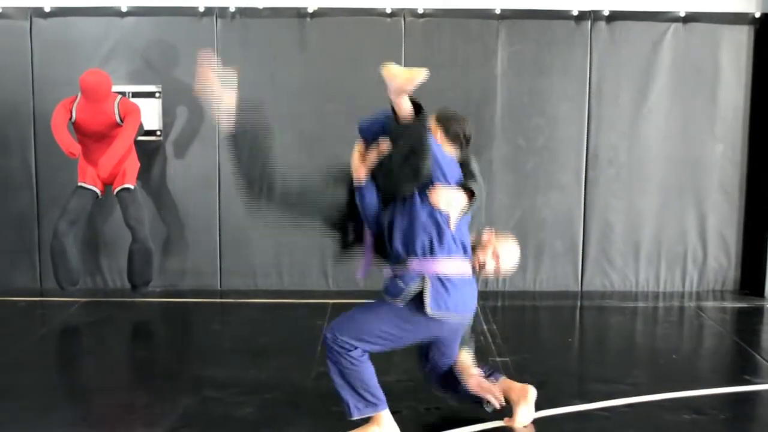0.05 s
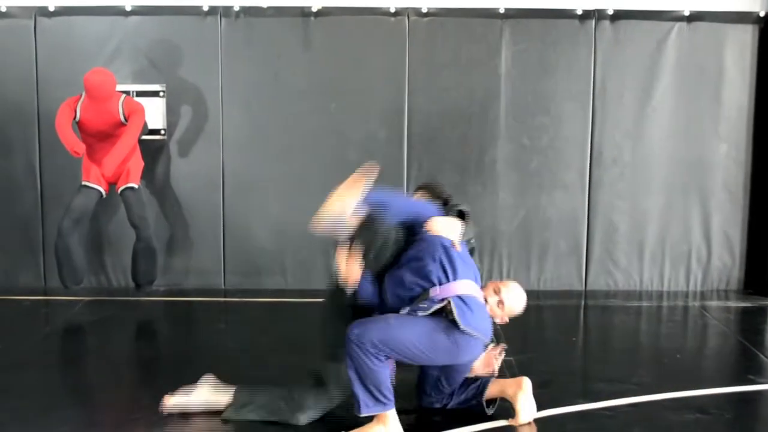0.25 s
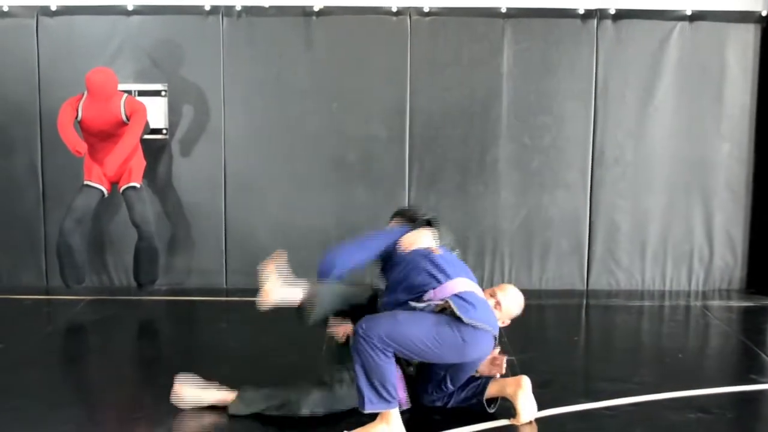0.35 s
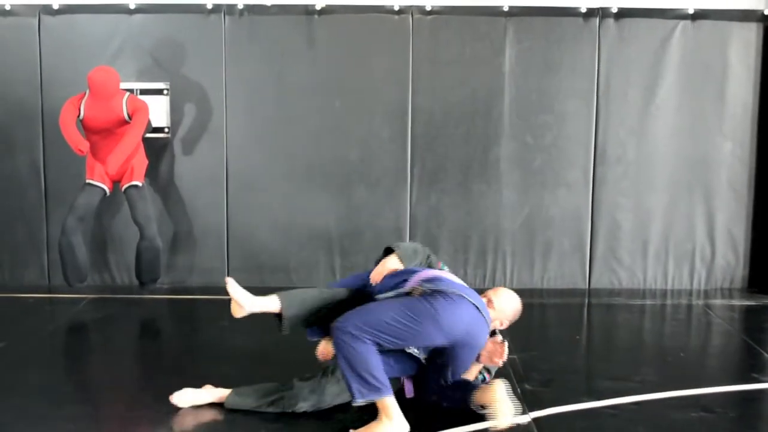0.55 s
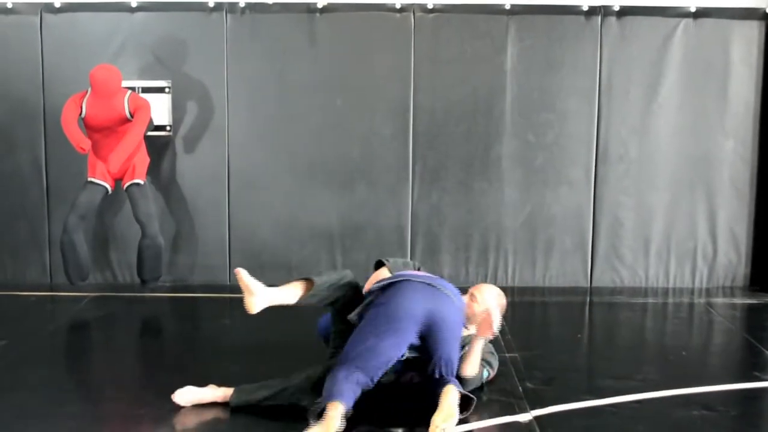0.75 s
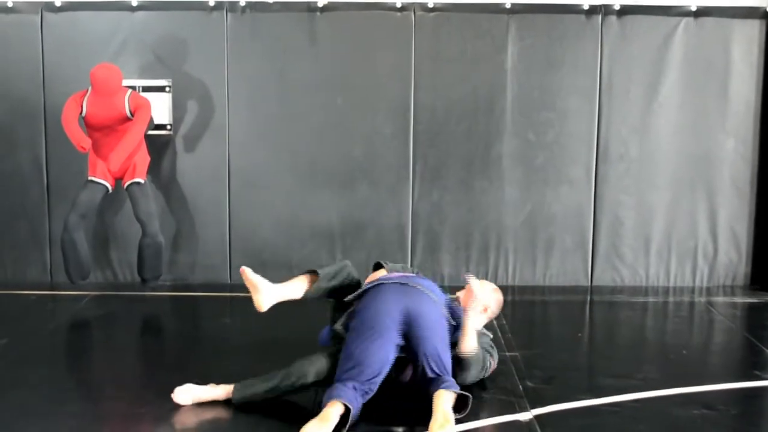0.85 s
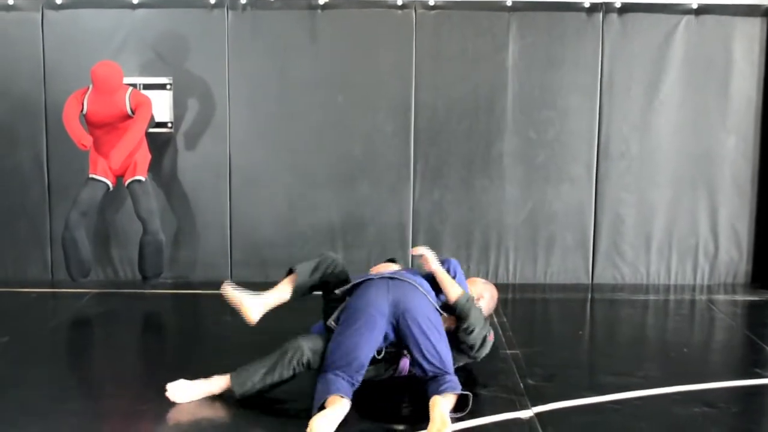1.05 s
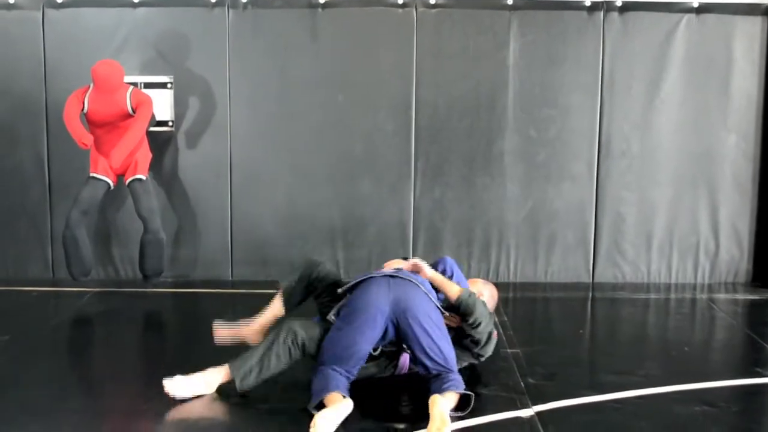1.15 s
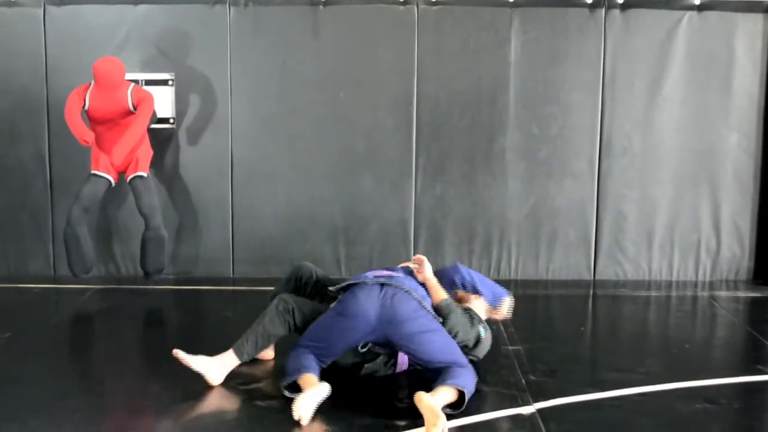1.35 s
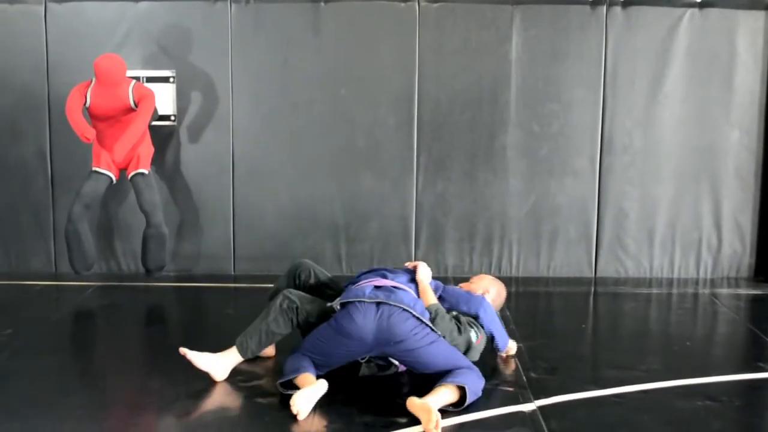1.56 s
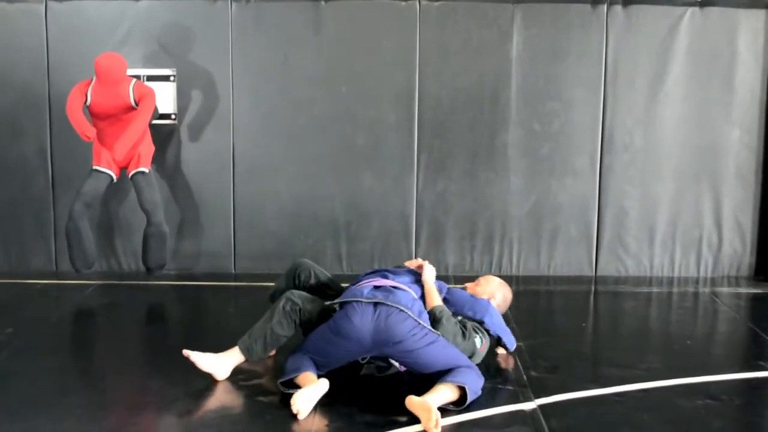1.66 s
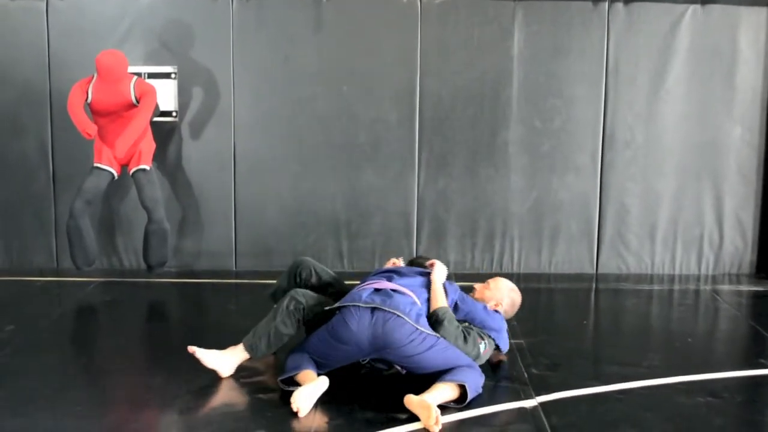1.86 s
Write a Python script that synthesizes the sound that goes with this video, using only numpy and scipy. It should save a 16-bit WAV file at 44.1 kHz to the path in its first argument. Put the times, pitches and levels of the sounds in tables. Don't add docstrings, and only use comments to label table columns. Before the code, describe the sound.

A body slams onto a padded mat at 0.28 s, a sharp clipped slap over a low thud, preceded by light foot knocks at 0.16 and 0.22 s, a faint cloth swish and a tiny sole squeak. A second thump lands at 0.40 s, with cotton rasping and rumbling until 0.7 s. Softer slaps come near 0.79 and 0.87 s, a crisp one at 1.26 s, then the hall's tail fades into quiet air and hiss.

```python
import sys
import numpy as np
from scipy import signal
from scipy.fft import rfft, irfft
from scipy.io import wavfile
from scipy.ndimage import uniform_filter1d

SR = 44100
rng = np.random.default_rng(int(sys.argv[2]) if len(sys.argv) > 2 else 0)


def generate_wav(signal):
    frames = np.transpose(np.atleast_2d(signal))
    scaled = np.clip(frames, -1, 1) * 32767
    pcm = np.round(scaled).astype(np.int16)
    wavfile.write(sys.argv[1], SR, pcm)


def voltage_ratio(decibels):
    exponent = np.asarray(decibels, float) / 20
    return 10 ** exponent


N = 83790


def rms_one(x):
    return x / np.sqrt(np.mean(x ** 2) + 1e-20)


def at_hz(points, hz, axis=1):
    p = np.array(points)
    return np.interp(np.log(hz), np.log(p[:, 0]), p[:, axis])


def drift(rate):
    r = np.exp(-40 * np.pi * rate / SR)
    white = rng.standard_normal(N // 20 + 2002)
    slow = signal.lfilter([1], [1, -2 * r, r * r], white)[2000:]
    return np.interp(np.arange(N) / 20, np.arange(len(slow)), rms_one(slow))


def bands(pair):
    edges = 24 * 2 ** np.arange(0, 10, 0.5)
    for k, (low, high) in enumerate(zip(edges, edges[1:])):
        band = signal.butter(2, [low, high], "band", fs=SR, output="sos")
        yield np.sqrt(low * high), signal.sosfilt(band, pair[k % 2])


def grains(size, grain_db):
    sizes = voltage_ratio(grain_db * np.minimum(rng.exponential(1, size), 5))
    return rms_one(sizes * rng.standard_normal(size))


def coloured(spectrum, patchy_db, rate, grain_db):
    shared = drift(rate)
    lowest, highest = spectrum[0][0], spectrum[-1][0]
    out = 0
    for hz, band in bands(grains((2, N), grain_db)):
        outside_db = 0 if lowest <= hz <= highest else -30
        flicker_db = patchy_db * (shared + 1.2 * drift(rate))
        out = out + band * voltage_ratio(at_hz(spectrum, hz) + outside_db + flicker_db)
    return rms_one(out)


def resonate(x, hz, width_hz):
    r = np.exp(-np.pi * width_hz / SR)
    return signal.lfilter([(1 - r * r) / 2, 0, (r * r - 1) / 2], [1, -2 * r * np.cos(2 * np.pi * hz / SR), r * r], x)


def add(out, s, x):
    i = int(s * SR)
    out[i:i + len(x)] += x[:N - i]


def room_air():
    # (frequency [Hz], level [dB])
    air_colour = [(15, -33), (25, 0.5), (166, -8), (185, -17), (326, -5.5), (659, -11.5), (1040, -5.5),
                  (1650, -16.5), (16000, -30.5)]
    return voltage_ratio(-43.5) * coloured(air_colour, patchy_db=0.2, rate=8, grain_db=0)


def microphone_hiss():
    return voltage_ratio(-57 + 3) * rng.standard_normal((2, N))


def hall(x):
    # (delay [s], level [dB])
    echoes = [
        (.0062, -12),
        (.0125, -12),
        (.019, -23),
        (0.033, -23),
    ]
    # (frequency [Hz], time to fade by 60 dB [s], level [dB])
    tail = [(59.6, 1.6, 2.5), (159, 0.96, -5), (395, 1.59, 6), (1020, 0.85, 1), (2020, 1.12, -1),
            (3500, 1.9, -3.5), (5800, 0.92, 3.5), (9300, 0.75, -1), (14500, 0.47, -13)]
    tail_db, onset_s = -7, 0.016
    near_db, near_fade_s = -5.5, 0.16

    flutter = np.zeros(SR // 10)
    flutter[0] = 1
    for delay, db in echoes:
        flutter[int(delay * SR)] += voltage_ratio(db)
    out = signal.fftconvolve(x, flutter)[:N]

    onset = np.exp(-1 / (onset_s * SR))
    near = voltage_ratio(-120 / (near_fade_s * SR))
    noise = rng.standard_normal((2, N))
    for (hz, struck), (_, diffuse) in zip(bands([x, x]), bands(noise)):
        far = voltage_ratio(-120 / (at_hz(tail, hz) * SR))
        energy = voltage_ratio(2 * near_db) * signal.lfilter([1 - near], [1, -near], struck ** 2)
        late = signal.lfilter([1 - onset], [1, -onset], struck ** 2)
        far_gain = voltage_ratio(2 * (tail_db + at_hz(tail, hz, axis=2)))
        energy += far_gain * signal.lfilter([1 - far], [1, -far], late)
        out += np.sqrt(energy + 1e-18) * rms_one(diffuse)
    return out


def swish():
    # (time [s], level [dB])
    sweep = [
        (0, -57),
        (.07, -53),
        (.1, -50),
        (.19, -49.5),
        (.25, -39.5),
        (.275, -47),
        (0.299, -47.5),
        (1.9, -77),
    ]
    s, db = np.transpose(sweep)
    band = signal.butter(2, [4470, 10100], "band", fs=SR, output="sos")
    hiss = rms_one(signal.sosfilt(band, rng.standard_normal(N)))
    return voltage_ratio(np.interp(np.arange(N) / SR, s, db) + 2.3 * drift(40)) * hiss


def rolling():
    # (time [s], weight on the mat [dB], dragging cloth [dB])
    roll = [(0, -45.5, -43), (.14, -46.5, -45), (.2, -37.5, -40), (.27, -36.5, -35), (.31, -22, -26),
            (.39, -20.5, -24.5), (.43, -17.5, -23), (.5, -23, -26.5), (.6, -29.5, -32.5), (.72, -36, -39.5),
            (.85, -37, -42), (1.0, -43, -41), (1.2, -53, -50), (1.4, -46, -49), (1.6, -71, -53),
            (1.9, -81, -59)]
    # (frequency [Hz], level [dB])
    mat_colour = [(29, -43), (50, -38), (145, 7), (229, -0.5), (345, -2), (555, -21), (664, 5.5),
                  (2500, -24.5), (3250, -41), (5500, -120)]
    # (frequency [Hz], level [dB])
    cloth_colour = [(760, -40), (1300, -0.5), (1750, -2.5), (4720, -2.5), (11500, -33), (12500, -29),
                    (15000, -46)]
    s, *levels = np.transpose(roll)
    weight_db, cloth_db = [np.interp(np.arange(N) / SR, s, level) for level in levels]
    rumble = coloured(mat_colour, patchy_db=0.54, rate=52, grain_db=2.5)
    rasp = coloured(cloth_colour, patchy_db=0.0, rate=76, grain_db=3)
    return voltage_ratio(weight_db) * rumble + voltage_ratio(cloth_db) * rasp


def squeaks():
    # (time [s], level [dB], pitch [Hz], length [s])
    squeak_events = [
        (0.231, -33, 4550, 0.006),
        (0.2366, -22, 4900, 0.004),
        (.2435, -24, 4900, 0.008),
        (0.2515, -30, 5450, 0.005),
    ]
    width_hz, roughness = 500, 0.5
    out, t = np.zeros(N), np.arange(SR // 20) / SR
    noises = rng.standard_normal((len(squeak_events), len(t)))
    for (s, db, hz, length), noise in zip(squeak_events, noises):
        rasp = rms_one(resonate(resonate(noise, hz, width_hz), hz, width_hz))
        whistle = np.sin(2 * np.pi * hz * t)
        swell = np.sin(np.pi * np.clip(t / length, 0, 1))
        add(out, s, voltage_ratio(db) * (whistle + roughness * rasp) * swell)
    return out


def pops():
    # (time [s], level [dB], length [s], direction [-1 suction, 1
    pop_events = [(.2789, 15, .00027, -1), (.27992, 16, .00011, -1), (.2805, -2, .0003, -1),
                  (.282, 14, .00015, -1), (.2876, -3, .0003, -1), (.288, 6, .0009, 1), (.289, 0, .0005, 1),
                  (.294, 4, .0013, 1), (.2949, -4, .00007, 1), (.2797, 4, .00005, 1), (.2802, 3, .0004, 1),
                  (.2852, -4, .0005, 1), (.2215, -14, .00015, -1), (.4038, -4, .0007, 1),
                  (.4097, -3, .0008, 1), (.4162, -5, .0007, 1), (.4272, -5, .0006, -1),
                  (.4575, -8, .0005, 1), (.2279, -17, .0002, 1), (.781, -22, .0005, 1),
                  (.7896, -17, .0002, 1), (.8638, -16, .0001, -1), (.8695, -16, .0003, 1),
                  (.875, -12, .00015, -1), (.8815, -16, .00015, -1), (1.2565, -13, .0004, -1),
                  (1.2592, -8, .0007, -1), (1.2646, -3, .00015, -1), (1.2658, 5, .0002, 1),
                  (1.2715, -6, .00015, 1), (1.2885, -12, .00025, 1), (1.577, -21, .0003, -1),
                  (1.5805, -24, .0003, 1)]
    out, t = np.zeros(N), np.arange(SR // 100) / SR
    for s, db, length, way in pop_events:
        pulse = np.sin(np.pi * np.clip(t / length, 0, 2))
        add(out, s, way * voltage_ratio(db - 10 * t / length) * pulse)
    return out


def slaps():
    # (time [s], level [dB], centre pitch [Hz], length [s], top hiss [dB])
    slap_events = [(0.04, -38, 1830, 0.051, -20), (0.156, -28, 2600, 0.0037, 3),
                   (0.2202, -21, 2600, 0.007, 1), (.2268, -24, 3000, .005, -8),
                   (.226, -26, 980, 0.011, -20), (.235, -30, 1260, 0.0085, -8),
                   (0.28, -9.5, 1460, 0.011, 8), (0.2792, -21, 5400, 0.0024, 8),
                   (.2818, -17, 4200, .002, -2), (0.286, -13.5, 2300, 0.0085, -24),
                   (0.311, -14, 920, 0.017, -19), (0.401, -14, 2200, 0.007, 2),
                   (0.406, -28.5, 4550, 0.043, 8), (.569, -29.5, 9500, 0.012, 0),
                   (0.7865, -24.5, 1330, 0.0093, -3), (.861, -21.5, 1100, 0.0077, -6),
                   (0.868, -25, 3360, 0.03, 1), (.8633, -28.5, 9000, .003, 6),
                   (.867, -19.5, 1170, 0.017, -4.5), (0.888, -28.5, 1020, 0.076, -11),
                   (0.902, -28.5, 3000, 0.021, -6), (1.2564, -13.5, 1810, 0.014, -3.5),
                   (1.257, -20, 600, 0.017, -27.5), (1.265, -13, 1960, 0.0057, -5),
                   (1.2643, -15.5, 5600, 0.0064, 5.5), (1.2685, -20, 5100, 0.015, 0),
                   (1.269, -21, 8700, 0.0066, 1), (1.264, -16, 1270, 0.021, -25),
                   (1.277, -22, 640, 0.017, -25), (1.2575, -18, 810, 0.022, -30),
                   (1.271, -24, 1760, 0.044, -3), (1.26, -21.5, 5660, 0.0049, -8),
                   (1.258, -25.5, 1850, 0.032, -21)]
    width = 0.62
    out, t = np.zeros(N), np.arange(SR // 5) / SR
    above = signal.butter(2, 4300, "high", fs=SR, output="sos")
    below = signal.butter(2, 11900, fs=SR, output="sos")
    hiss_filter = np.vstack([above, below])
    puffs = grains((len(slap_events), len(t)), 3.5)
    for (s, db, hz, length, top_db), puff in zip(slap_events, puffs):
        shape = voltage_ratio(-20 * t / length) * np.minimum(t / (0.15 * length), 1)
        burst, strength = puff * shape, np.linalg.norm(shape)
        body = resonate(resonate(burst, hz, width * hz), hz, 2 * width * hz)
        body *= strength / np.linalg.norm(body)
        hiss = signal.sosfilt(hiss_filter, burst) * strength / np.linalg.norm(burst)
        add(out, s, voltage_ratio(db) * (body + voltage_ratio(top_db) * hiss))
    return out


def thuds():
    # (time [s], level [dB], pitch [Hz], time to fade by 60 dB [s])
    thud_events = [(0.1573, -8.5, 820, 0.006), (0.159, -25.5, 91, 0.071), (0.2207, -2.5, 330, 0.0099),
                   (.2205, -14.5, 1493, 0.019), (0.264, -17.5, 290, 0.04), (0.2804, -6, 148, 0.07),
                   (.2805, -12, 1350, .03), (.415, -13, 340, .05), (.53, -17, 380, .05),
                   (.63, -20, 330, .06), (.2805, -18, 645, 0.12), (0.28, -18, 1030, 0.047),
                   (0.289, -15, 70, 0.09), (0.4039, -6.5, 370, 0.041), (.445, -15, 380, 0.038),
                   (.478, -12, 272, 0.033), (.562, -18, 348, 0.035), (0.716, -16.5, 384, 0.022),
                   (.76, -26.5, 340, 0.071), (.868, -16, 1002, 0.05), (.873, -18, 1100, 0.03),
                   (.883, -21, 980, .05), (.897, -23, 1090, .05), (.915, -25, 1020, .05),
                   (1.2575, -18.5, 355, 0.062), (1.262, -21, 99, 0.11), (1.272, -23, 213, 0.091),
                   (1.385, -31, 352, 0.054), (1.2643, -16, 2700, .035), (1.2655, -17, 1750, .035),
                   (1.259, -19, 2350, .04), (1.268, -19, 1390, .04), (1.258, -22.5, 606, 0.046),
                   (1.281, -23.5, 334, 0.033), (1.44, -33, 39, 0.26)]
    out, t = np.zeros(N), np.arange(SR // 4) / SR
    for s, db, hz, ring in thud_events:
        add(out, s, voltage_ratio(db - 60 * t / ring) * np.sin(2 * np.pi * hz * t))
    return out


def microphone_tone(x):
    octaves = np.log2(np.fft.rfftfreq(N, 1 / SR) / 7050 + 1e-6)
    step_db = -8 * (1 + np.tanh(octaves / 0.17)) / 2
    fall_db = -1.5 * np.maximum(octaves, 0)
    return irfft(rfft(x) * voltage_ratio(step_db + fall_db), N)


def scene():
    bursts = pops()
    to_hall = voltage_ratio(-8)
    in_hall = hall(thuds() + slaps() + squeaks() + to_hall * bursts)
    action = in_hall + (1 - to_hall) * bursts + rolling()
    no_rumble = signal.butter(2, 57, "high", fs=SR, output="sos")
    action = microphone_tone(signal.sosfilt(no_rumble, action)) + swish()
    return action + room_air() + microphone_hiss()


def roll_off(x):
    return signal.sosfilt(signal.butter(12, 16620, fs=SR, output="sos"), x)


def record(dry):
    duck_from_db, duck_share, duck_attack_s = -17, 0.34, 0.0025
    recovery_db = 41 * np.arange(N) / SR
    level_db = 10 * np.log10(uniform_filter1d(dry.mean(axis=0) ** 2, size=441) + 1e-12)
    held_db = np.maximum.accumulate(level_db + recovery_db) - recovery_db
    over_db = np.maximum(held_db - duck_from_db, 0)
    r = np.exp(-1 / (duck_attack_s * SR))
    ducked = dry * voltage_ratio(-duck_share * signal.lfilter([1 - r], [1, -r], over_db))
    top_cut = signal.ellip(10, 0.5, 50, 15900, fs=SR, output="sos")
    clipped = np.clip(signal.sosfilt(top_cut, ducked), -1, 1)
    return roll_off(clipped)


dry = scene()
out = record(dry)
generate_wav(out)
```